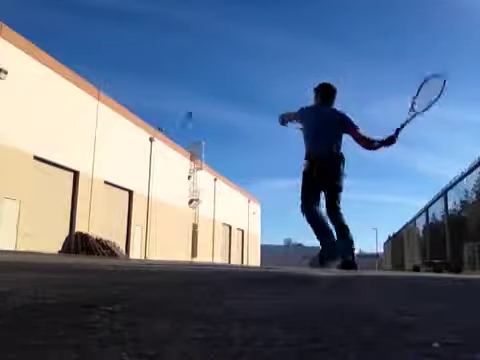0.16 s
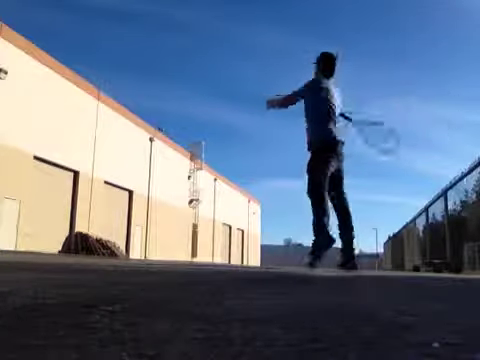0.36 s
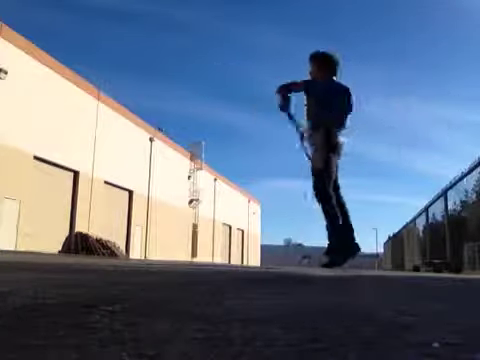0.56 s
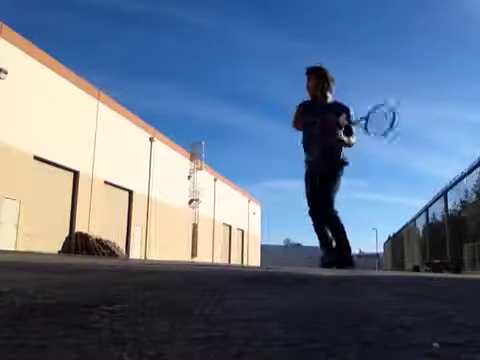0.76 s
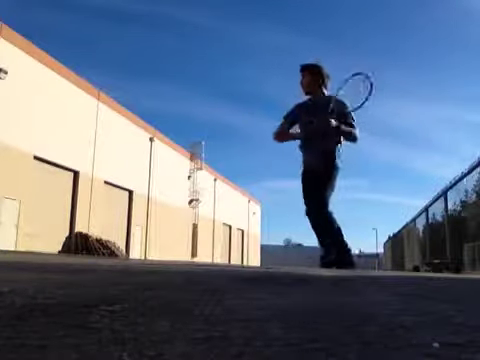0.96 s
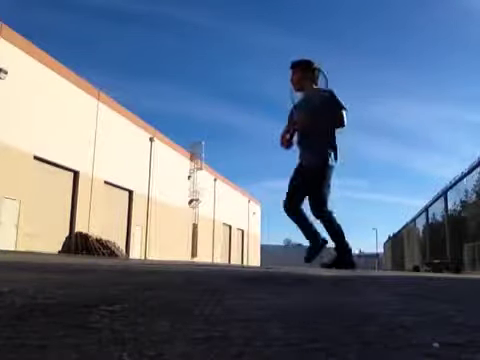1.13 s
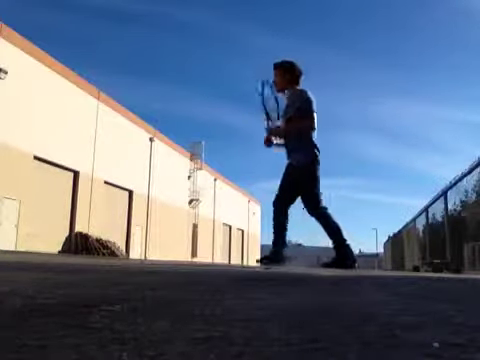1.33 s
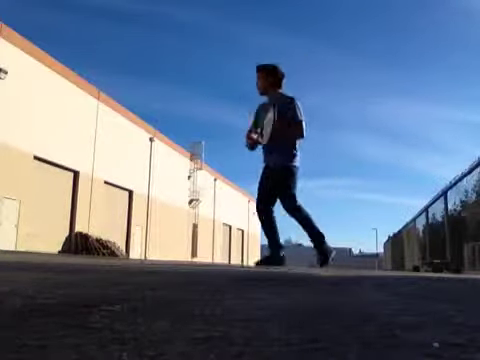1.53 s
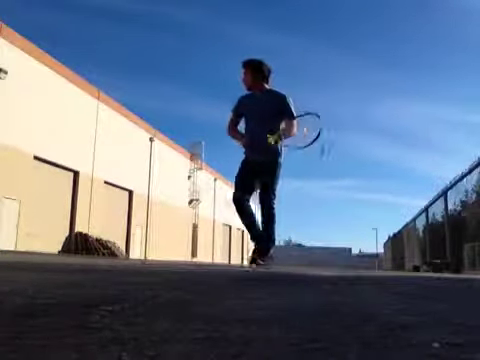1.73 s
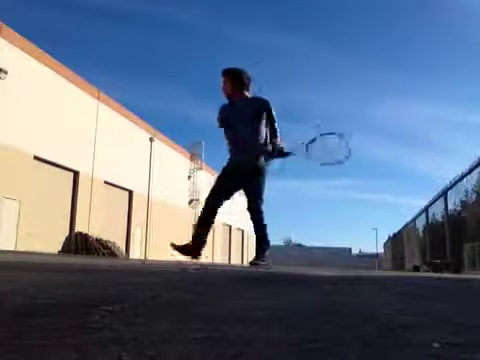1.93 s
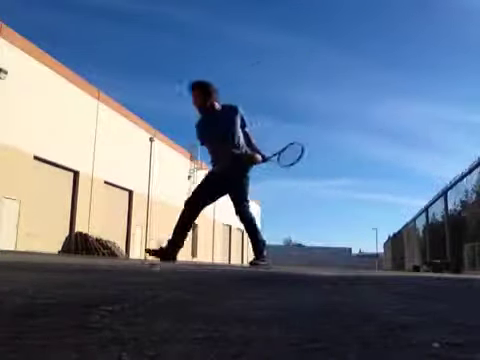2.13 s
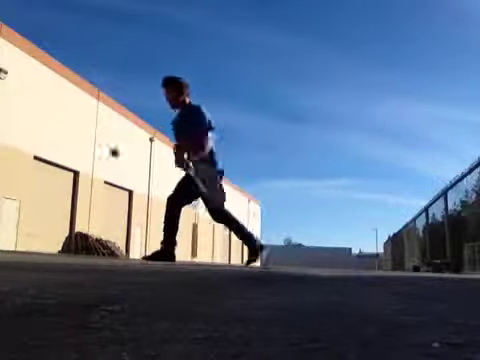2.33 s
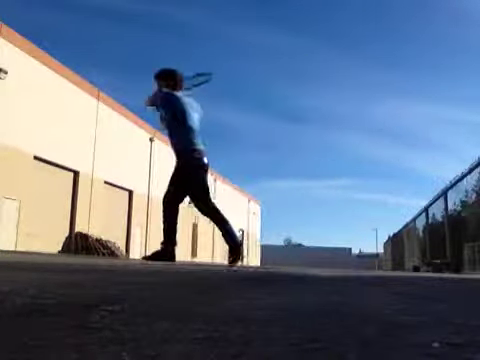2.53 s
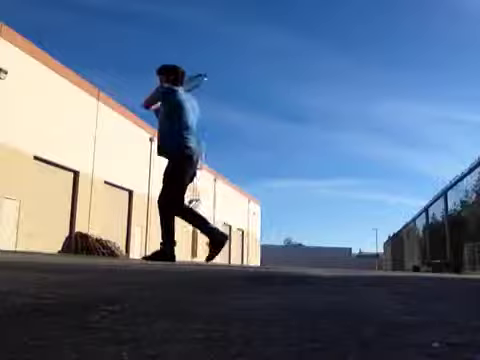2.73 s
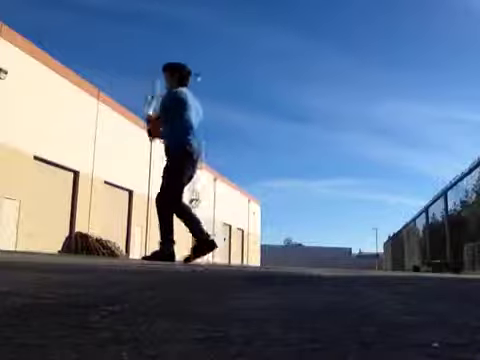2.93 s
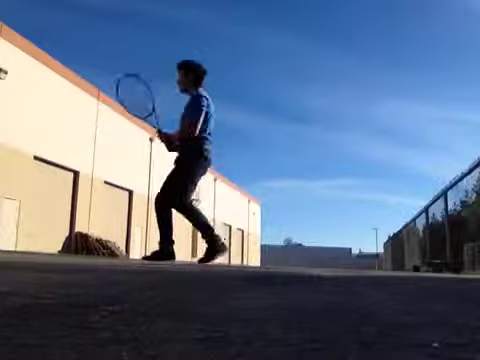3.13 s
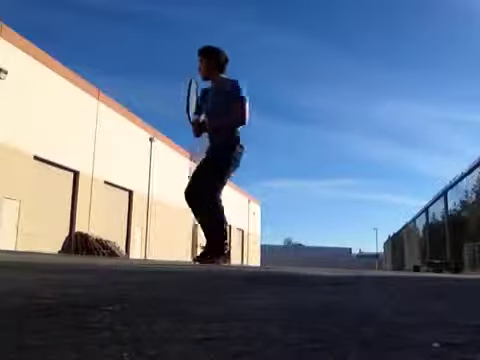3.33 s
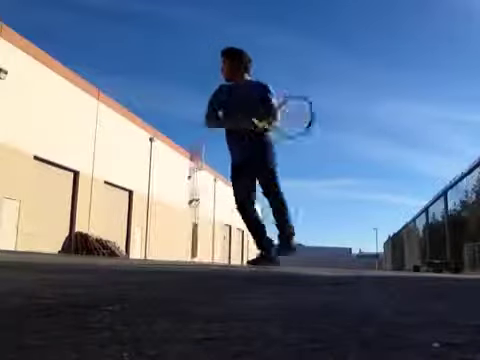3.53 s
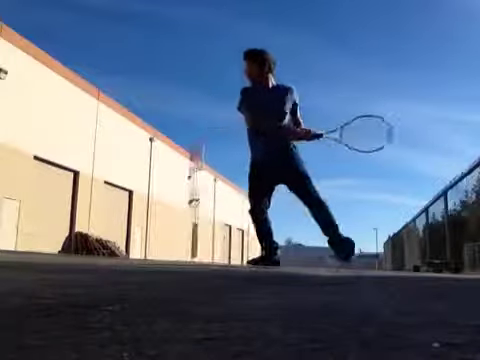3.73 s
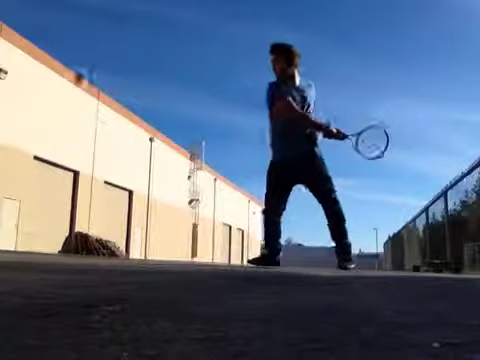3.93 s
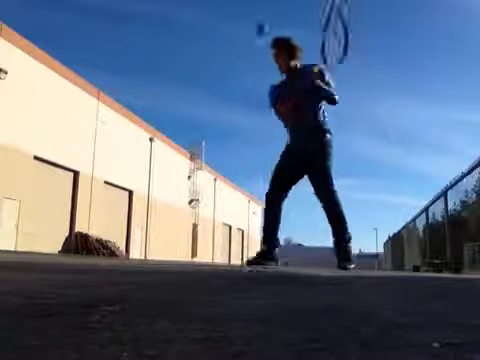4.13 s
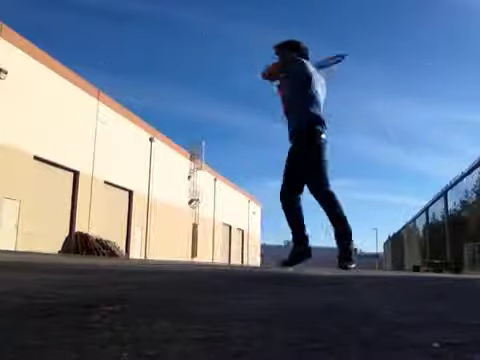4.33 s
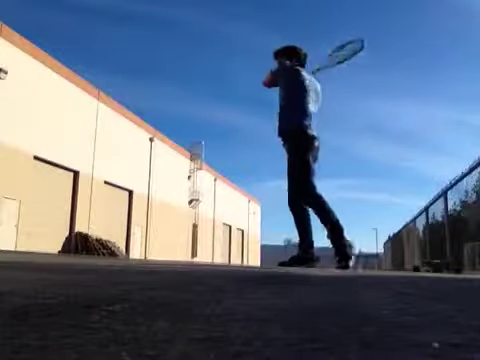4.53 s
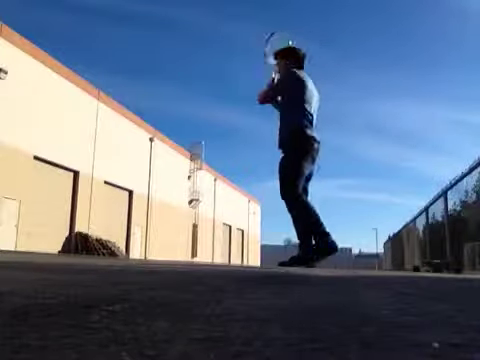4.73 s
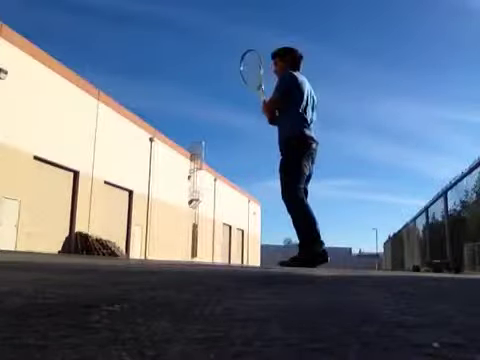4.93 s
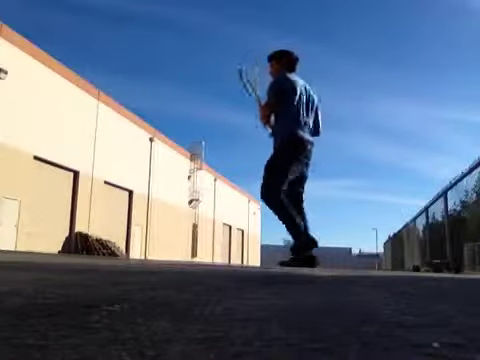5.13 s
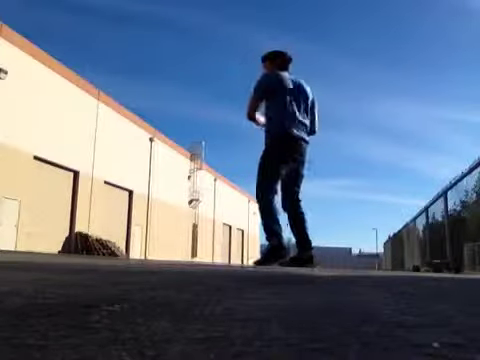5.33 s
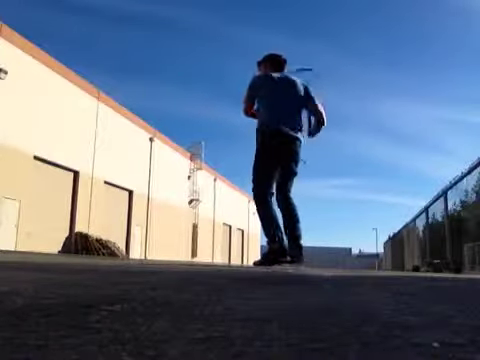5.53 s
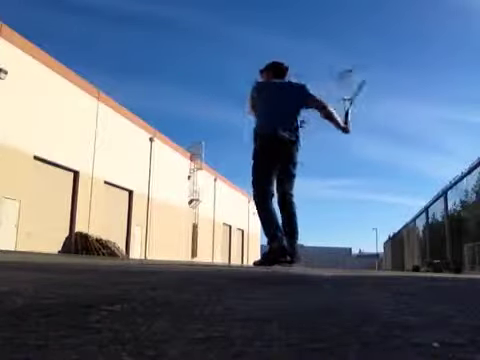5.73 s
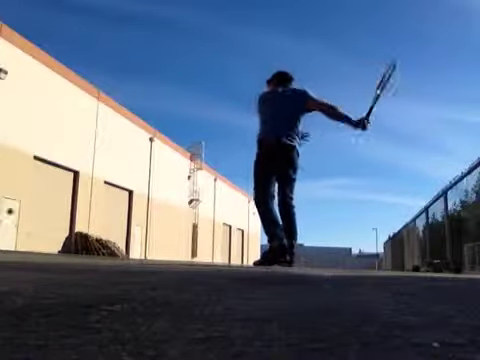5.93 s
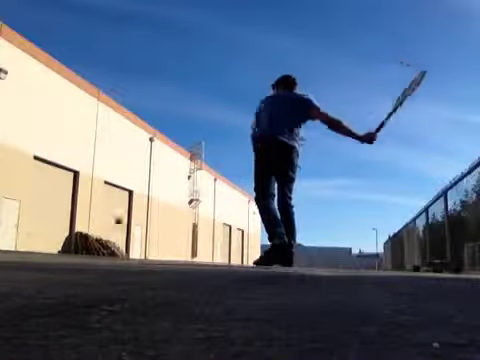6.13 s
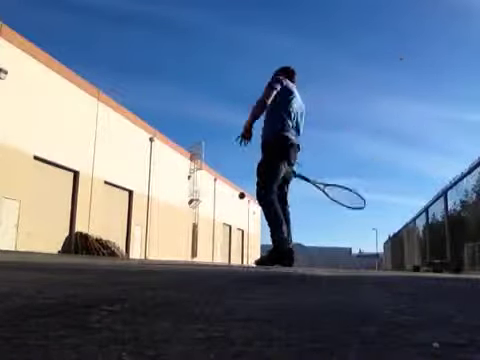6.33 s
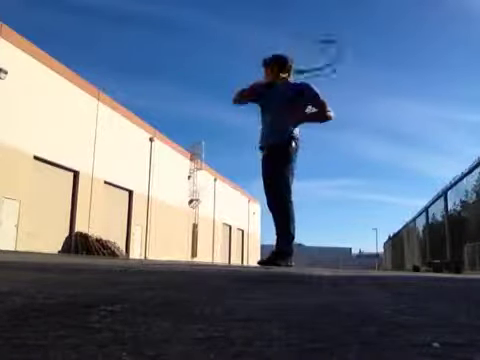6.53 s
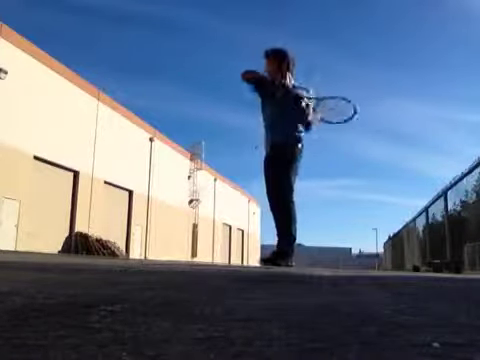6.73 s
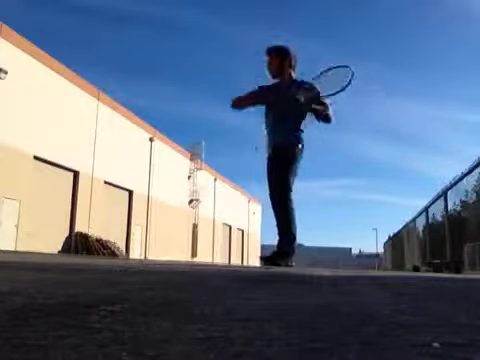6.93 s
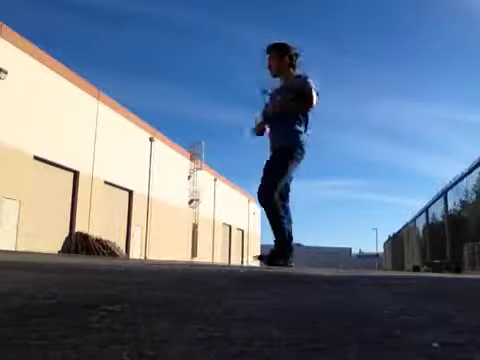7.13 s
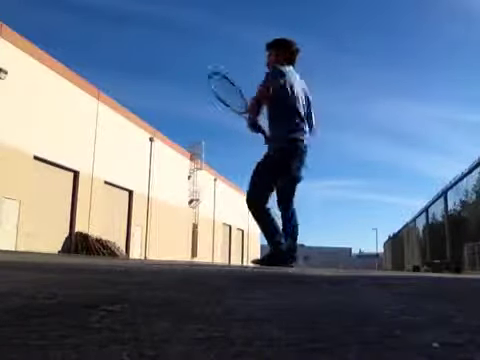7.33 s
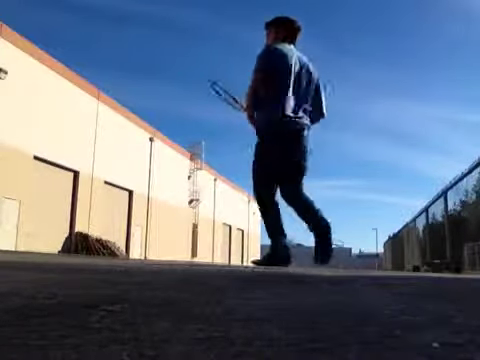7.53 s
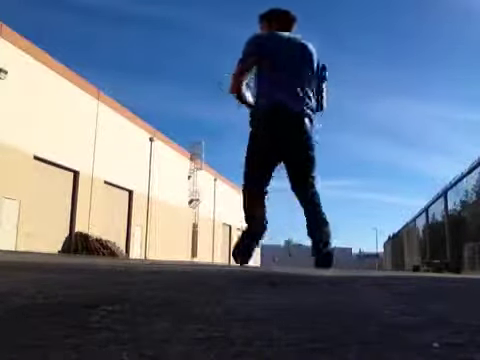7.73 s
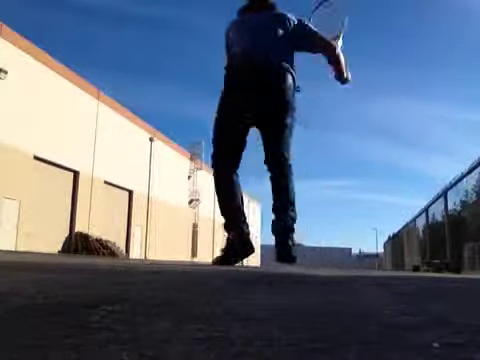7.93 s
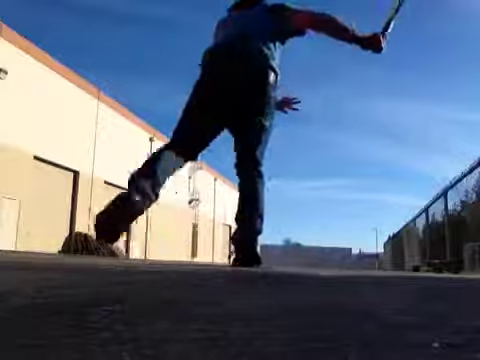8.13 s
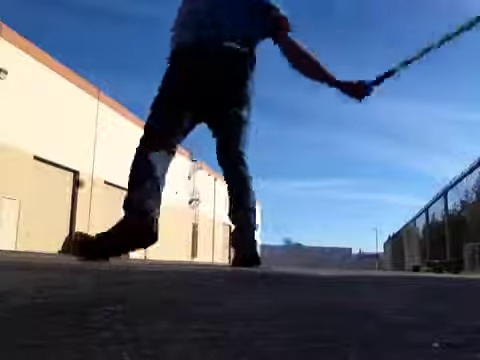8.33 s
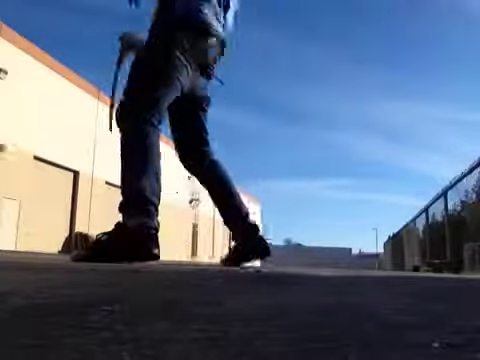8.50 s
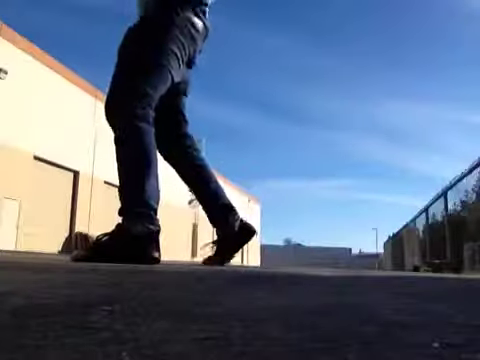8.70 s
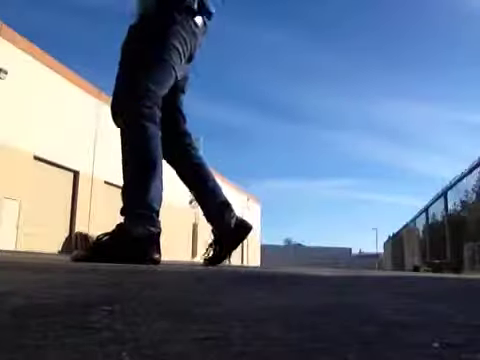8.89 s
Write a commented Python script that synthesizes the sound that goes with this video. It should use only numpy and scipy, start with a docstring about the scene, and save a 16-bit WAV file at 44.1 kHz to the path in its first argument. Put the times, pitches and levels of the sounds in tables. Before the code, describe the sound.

A steady solo rally, one racket stroke roughly every two seconds: a fuzzy rising string whistle cut off by a bright, hollow pop, then a tighter knock from the concrete wall and a faint dull bounce on asphalt. Soles slide and tap on grit, busiest and closest near the end. Short outdoor echoes, low far traffic and thin microphone hiss surround it in mono.

```python
"""A racket pops a hollow felt ball against a concrete wall, outdoors on asphalt.
Each pop is a felt crack, a thump of squeezed air, a ringing cavity and a rattling rubber shell.
The wall echoes each stroke; the swung strings whistle, made of noise whose pitch follows their speed.
Shoes scuff and tap in grainy noise and short knocks, and far traffic hums in coloured noise and low notes.
A small microphone adds hiss and turns its gain down after loud pops."""
import sys
import numpy as np
from scipy import signal
from scipy.fft import rfft, irfft, next_fast_len
from scipy.io import wavfile
from scipy.ndimage import uniform_filter1d, map_coordinates

SR = 44100
rng = np.random.default_rng(int(sys.argv[2]) if len(sys.argv) > 2 else 0)


def elevation(decibels):
    """Turn decibel levels (scalar or array-like) into linear amplitude ratios."""
    levels = np.asarray(decibels, float)
    return 10 ** (levels / 20)


def wav_out(sig):
    """Save sig, one row per channel (or a flat mono array), as 16-bit PCM at SR to the path in sys.argv[1]."""
    wavfile.write(sys.argv[1], SR, np.round(np.clip(np.atleast_2d(sig).T, -1, 1) * 32767).astype(np.int16))


N = 395136  # length in samples

# strings hitting the ball: t/s, felt crack level/dB, thump level/dB, cavity level/dB, shell level/dB, cavity f/Hz
STROKES = [(.4779, -26, -1, -6, -14.5, 933), (2.4136, -19, 0.5, -4, -15, 928),
           (4.2191, -19, -0.5, -3.5, -16.5, 910), (6.4339, -20, -1.5, -4.5, -19, 896),
           (8.5241, -20.5, 2.5, -5, -16, 939)]


def unit(x):
    """Scales a sound to rms 1."""
    return x / np.sqrt(np.mean(x ** 2) + 1e-20)


def along(points, hz):
    """Reads a curve of (f/Hz, value) points on a log frequency axis."""
    f, value = np.transpose(points)
    return np.interp(np.log(hz + 1), np.log(f + 1), value)


def filtered(x, response):
    """Multiplies the spectrum of x by a response of frequency."""
    size = next_fast_len(len(x) + 8192)  # spare room for the filter to ring out
    return irfft(rfft(x, size) * response(np.fft.rfftfreq(size, 1 / SR)), size)[:len(x)]


def small(sound, hz):
    """A small body radiates little bass: a steep cut below hz."""
    return filtered(sound, lambda f: (1j * f / hz / (1 + 1j * f / hz)) ** 3)


def dull(sound, hz):
    """Rolls off the treble above hz, as in a far reflection."""
    return filtered(sound, lambda f: 1 / (1 + 1j * f / hz) ** 2)


def noise(spectrum, size=N):
    """Noise of rms 1, coloured by (f/Hz, level/dB per Hz) points."""
    return unit(filtered(rng.standard_normal(size), lambda hz: elevation(along(spectrum, hz))))


def wobble(rate):
    """A smooth random curve through rate knots a second."""
    knots = rng.standard_normal(int(N * rate / SR) + 4)
    return map_coordinates(knots, [np.arange(N) * rate / SR])


def add(track, s, sound):
    """Mixes a sound into the track at s seconds."""
    part = track[round(s * SR):][:len(sound)]
    part += sound[:len(part)]


def ring(hz, db, t60, delay_ms, attack=0.0001):
    """A damped vibration starts after a delay, builds up over attack seconds and falls 60 dB in t60 seconds."""
    t = np.maximum(np.arange(SR // 10) / SR - delay_ms / 1000, 0)
    return elevation(db - 60 * t / t60) * np.sin(2 * np.pi * hz * t) * (1 - np.exp(-t / attack))


def traffic():
    """Far rumble and tyre roar are coloured noises of changing level; engines are low gliding sine notes."""
    # rumble and roar as heard, with a dip after the loud stroke at 2.41 s: t/s, rumble level/dB, roar level/dB
    levels = [(0, -56.5, -55.5), (.4, -52.5, -55.5), (.62, -53, -52), (1.42, -54, -56.5),
              (1.75, -53.5, -54.5), (2.44, -55, -58.5), (2.62, -60, -58), (3.1, -56, -60),
              (4.16, -55.5, -57), (4.59, -56.5, -57.5), (5.01, -53, -57.5), (5.6, -55, -58),
              (6.44, -53, -56.5), (6.96, -52.5, -55.5), (8.48, -53.5, -55), (8.96, -56.5, -58)]
    # colour of the rumble: f/Hz, level/dB per Hz
    rumble_colour = [(15, -81), (25, -58), (49, -25), (70, -26.5), (125, -2), (161, -4), (237, -5),
                     (325, -12.5), (600, -20.5), (780, -56), (1320, -120)]
    # colour of the tyre roar: f/Hz, level/dB per Hz
    roar_colour = [(210, -20), (350, -10), (550, -8.5), (642, -6.5), (1150, -9.5), (1370, -15), (2030, -22),
                   (6000, -39), (7800, -63), (13200, -120)]
    # engine notes: start t/s, end t/s, first f/Hz, last f/Hz, first level/dB, last level/dB
    engines = [(-.2, 1.6, 81, 80.5, -58.5, -67), (4.7, 5.7, 93.1, 97, -54, -66),
               (5.5, 6.1, 88, 90.4, -61, -54), (6.7, 7.4, 108, 100, -65, -67),
               (7.7, 9.1, 77.6, 78.5, -58, -68)]
    t = np.arange(N) / SR
    s, rumble_db, roar_db = np.transpose(levels)
    rumble = elevation(np.interp(t, s, rumble_db) + 0.76 * wobble(14)) * noise(rumble_colour)
    roar = elevation(np.interp(t, s, roar_db) + 0.9 * wobble(8)) * noise(roar_colour)
    notes = np.zeros(N)
    for s, hz, db in np.reshape(engines, (-1, 3, 2)):
        fade = np.clip(np.minimum(t - s[0], s[-1] - t) / 0.31, 0, 1)
        phase = 2 * np.pi * np.cumsum(np.interp(t, s, hz)) / SR
        notes += np.sqrt(2) * fade * elevation(np.interp(t, s, db)) * np.sin(phase)
    return rumble + roar + notes


def hiss():
    """The microphone's own steady noise."""
    # colour of the hiss: f/Hz, level/dB per Hz
    colour = [(2350, -36), (4000, -3.5), (4800, -3.5), (5280, -2.5), (10100, -11), (14300, -4), (15500, -5)]
    return elevation(-73.5) * noise(colour)


def grit(s, db, hz, rise, fall, octaves):
    """Grit crunches in uneven grains: noise in a band around hz; returns the start and the sound."""
    t = np.arange(SR // 2) / SR
    grain_db = 3.4 * unit(uniform_filter1d(rng.standard_normal(len(t)), size=80))
    grains = rng.standard_normal(len(t)) * elevation(grain_db)

    def band(f):
        return np.exp(-.5 * (np.log2((f + 1) / hz) / octaves) ** 2 - (f / 11000) ** 2)

    colour = unit(filtered(grains, band))
    falling = elevation(-60 * (np.maximum(t - rise, 0) / fall) ** .85)
    return s - rise, elevation(db) * np.minimum(t / rise, 1) ** 2 * falling * colour


def shoes():
    """Stones click, soles slide and drag in bands of grainy noise; heels knock the ground with two damped notes."""
    # single stones under a sole: t/s, level/dB, centre f/Hz
    ticks = [(.054, -63, 9000), (.112, -56, 3000), (.328, -55.5, 9200), (.407, -54, 3500),
             (.495, -48, 10000), (.786, -43, 5170), (1.431, -61, 8150), (1.825, -56, 10000),
             (2.145, -60, 4000), (3.856, -58, 5000), (7.64, -41, 2300), (7.748, -40, 7850),
             (7.76, -46, 6000), (7.892, -55, 5000), (8.1, -61, 10100), (8.149, -57, 7900),
             (8.432, -55, 9000), (8.695, -57, 8050), (8.709, -59, 11000), (8.804, -59, 5960)]
    # soles sliding on grit: t/s, level/dB, fall time/s, centre f/Hz, width/octaves
    slides = [(.66, -50.5, 0.11, 5700, 2.1), (0.791, -43.5, 0.099, 4470, 1.5), (1.53, -59, 0.12, 6000, 2),
              (2.786, -54, 0.079, 3640, 0.65), (2.82, -57, 0.067, 4370, 1.1), (3.5, -62, 0.15, 7050, 3),
              (4.093, -51.5, 0.1, 3500, 3.1), (4.364, -50, 0.18, 3470, 3.3), (4.64, -69, 0.11, 5030, 1.5),
              (5.439, -60, 0.26, 5960, 4.6), (7.591, -48.5, 0.23, 3870, 1.1),
              (7.622, -45.5, .14, 7050, 6.7), (7.77, -50, 0.072, 6000, 0.69),
              (8.037, -48.5, 0.13, 3500, 3.3), (8.059, -45, 0.07, 7000, 5)]
    # slow soft hisses with a faint narrow tone, perhaps a dragged sole: t/s, hiss level/dB, tone level/dB, f/Hz
    drags = [(.87, -60, -59.5, 3820), (1.77, -59.5, -63, 3750), (2.01, -70, -74, 4750),
             (3.33, -90, -81, 4700), (3.41, -80, -74, 3680), (5.72, -94, -76, 2800),
             (6.36, -63.5, -74, 4300), (7.19, -65, -70, 4320)]
    # heels landing: t/s, level/dB, f/Hz, t60/s
    heels = [(.135, -23.5, 266, 0.0047), (0.793, -36, 300, .015), (7.603, -23.5, 575, 0.0084),
             (7.768, -33.5, 950, 0.014), (7.829, -21.5, 300, 0.011), (8.037, -28.5, 446, 0.032),
             (8.065, -23.5, 860, 0.0065), (8.278, -30.5, 300, 0.014)]
    track = np.zeros(N)
    for row in ticks:
        add(track, *grit(*row, rise=0.0011, fall=0.029, octaves=0.89))
    for s, db, fall, hz, octaves in slides:
        add(track, *grit(s, db, hz, rise=.09 * fall, fall=fall, octaves=octaves))
    for s, hiss_db, tone_db, hz in drags:
        add(track, *grit(s, hiss_db, hz, rise=0.053, fall=0.18, octaves=1))
        add(track, *grit(s, tone_db, hz, rise=0.11, fall=0.42, octaves=.08))
    for s, db, hz, t60 in heels:
        low = ring(hz, db, t60, 0, attack=0.00034)
        high = ring(2.13 * hz, db - 11.5, 1.76 * t60, 0)
        add(track, s, small(low + high, hz=90))
    return track


def arc(top_s, top_hz, half_s, whistle_db, rush_db, contact_s=np.inf):
    """One sweep: speed follows a bell curve until the ball is hit; pitch and loudness follow the speed."""
    # parts of the string bed at their own speeds: pitch ratio, relative width, level/dB
    whistles = [(1, .04, 0), (.82, .04, -7), (.69, .05, -3), (.58, .04, -6), (.49, .035, -6),
                (1.3, .06, -16)]
    # colour of the rush at the speed that whistles at 9 kHz: f/Hz, level/dB per Hz
    rush_colour = [(300, 5), (1500, -11.5), (4000, -4), (9000, -9), (15000, -15.5), (22000, -28)]
    t = top_s + np.arange(-2.2 * half_s, 2.5 * half_s, 1 / SR)

    def speed(s):
        return .5 ** (((np.minimum(s, contact_s) - top_s) / half_s) ** 2)

    # two noises, recoloured frame by frame as the speed changes
    raw = rng.standard_normal((2, SR // 2))[:, :len(t)]
    f, frame, z = signal.stft(raw, SR, nperseg=192)
    whistle_hz = top_hz * np.maximum(speed(frame + t[0]), .3)
    ratio = (f[:, None] + 1) / whistle_hz
    bands = sum(elevation(db) * np.exp(-.5 * (np.log(ratio / part) / width) ** 2) for part, width, db in whistles)
    gains = [bands, elevation(along(rush_colour, 9000 * ratio))]
    whistle, rush = signal.istft(z * gains, nperseg=192)[1][:, :len(t)]
    # the ball brakes the strings, so both sounds die away; loudness grows with a power of speed
    braked = np.maximum(t - contact_s, 0)
    whistle = elevation(whistle_db - 60 * braked / 0.023) * speed(t) ** 5.3 * unit(whistle)
    rush = elevation(rush_db - 60 * braked / 0.2) * speed(t) ** 2.4 * unit(rush)
    return t[0], whistle + rush


def racket():
    """Strings shed vortices: fuzzy whistles over a rush of air, into the ball and again in the follow-through."""
    # swings, one a stroke: bell top t/s, whistle f/Hz there, time from half to top speed/s,
    # whistle level/dB, rush level/dB
    swings = [(.478, 9100, 0.09, -57, -53.5), (2.411, 10050, 0.079, -32.5, -46.5),
              (4.203, 8660, 0.071, -42.5, -51), (6.445, 10500, .065, -48, -45.5),
              (8.535, 10770, 0.066, -34, -39.5)]
    # follow-throughs, one a stroke, same columns: t/s, f/Hz, time/s, whistle level/dB, rush level/dB
    follows = [(0.541, 7200, 0.1, -71, -52), (2.464, 8300, 0.08, -56, -79), (4.27, 7200, 0.098, -59.5, -63),
               (6.5, 8450, 0.094, -67, -54.5), (8.589, 8200, 0.076, -71, -53)]
    track = np.zeros(N)
    for swing, follow, stroke in zip(swings, follows, STROKES):
        add(track, *arc(*swing, contact_s=stroke[0]))
        add(track, *arc(*follow))
    return track


def blow(row, thump_hz, quick_db, thump_ms, ring_ms, damping, crack_t60, snap_db, recrack_db, rattle_t60,
         way=1, widen=1):
    """The felt cracks, the squashed ball pumps one thump of air, its cavity rings and its shell rattles."""
    # colour of the felt crack: f/Hz, level/dB per Hz
    felt = [(1500, -18), (4000, 0), (9000, -14.5), (15000, -44)]
    # the ball's air cavity: pitch ratio, level/dB against the ring, t60/s before the surface damps it
    air_modes = [(0.992, 0.5, 0.024), (1.21, -9, 0.032), (0.943, -6.5, .018), (1.02, -19, .08)]
    # rubber shell: f/Hz, width/Hz before the surface widens it, level/dB against the other modes
    shell_modes = [(1500, 250, -9), (1800, 110, 0), (2080, 220, -6), (2445, 100, 0), (3340, 500, -13),
                   (4230, 600, -14), (5000, 700, -14)]
    crack_db, thump_db, cavity_db, shell_db, cavity_hz = row
    t = np.arange(SR // 10) / SR

    # the felt cracks again as the ball leaves the surface
    leave_s = 0.0041
    again = (t > leave_s) * elevation(recrack_db - 60 * np.maximum(t - leave_s, 0) / crack_t60)
    crack = elevation(crack_db) * (elevation(-60 * t / crack_t60) + again) * noise(felt, size=len(t))
    snap = -ring(1250, thump_db + snap_db, .004, 0, attack=.00005)

    # squashing and springing back: a slow and a quick swing of the same push
    slow = ring(thump_hz, thump_db, .012, thump_ms, attack=.0005)
    quick = ring(1.55 * thump_hz, thump_db + quick_db, .012, thump_ms, attack=.0005)
    thump = way * (slow + quick)

    cavity = sum(ring(ratio * cavity_hz, cavity_db + db, t60 / damping, ring_ms, attack=.0011 / damping)
                 for ratio, db, t60 in air_modes)

    # a short scrub of noise shakes the shell's modes, a little differently at each blow
    scrub = rng.standard_normal(len(t)) * elevation(-60 * t / rattle_t60) * np.minimum(t / .002, 1)
    struck_db = rng.normal(0, 3, len(shell_modes))

    def resonances(f):
        total = 0
        for k, (centre, width, db) in enumerate(shell_modes):
            loss = 1j * f * width * widen
            total = total + (-1) ** k * elevation(db + struck_db[k]) * loss / (centre * centre - f * f + loss)
        return total

    shell = filtered(dull(scrub, hz=4000), resonances)
    return small(crack + snap + thump + cavity + elevation(shell_db) * shell / np.abs(shell).max(), hz=108)


def yard(sound, db):
    """Scattered returns from ground, fence and buildings; each frequency dies at its own speed."""
    # how long the scattered tail lasts: f/Hz, t60/s
    decay = [(150, 0.46), (1000, 0.29), (2500, 0.42), (5000, 0.36), (12000, 0.31)]
    hz, t, z = signal.stft(rng.standard_normal(SR // 2), SR, nperseg=256)
    tail = signal.istft(z * elevation(-60 * t / along(decay, hz)[:, None]), SR, nperseg=256)[1]
    return elevation(db) * signal.fftconvolve(sound, tail / np.linalg.norm(tail))


def wall_echo(pop, db):
    """The ringing ball flies towards the wall, so its echo comes back higher, duller and shorter."""
    sample = np.arange(len(pop))
    higher = np.interp(1.2 * sample, sample, pop, right=0)
    age = sample / SR
    fading = elevation(db + 8.5 - 60 * age / 0.062) * np.minimum(age / 0.0037, 1)
    return small(dull(fading * higher, hz=1540), hz=202)


def strokes():
    """Strings strike the ball; the wall returns an echo and the yard scatters both."""
    # each stroke's wall echo: delay/s, level/dB before a common lift of 8.5 dB
    echoes = [(.066, -13), (.0675, -19), (.072, -17), (.067, -14), (.0718, -18)]
    track = np.zeros(N)
    for (s, *row), (delay, db) in zip(STROKES, echoes):
        pop = blow(row, thump_hz=315, quick_db=-3, thump_ms=1.3, ring_ms=3.45, damping=1, crack_t60=.009,
                   snap_db=-12, recrack_db=-9, rattle_t60=.045)
        echo = wall_echo(pop, db)
        add(track, s, pop)
        add(track, s + delay, echo)
        add(track, s + delay + .008, yard(echo, db=-8.5))
        add(track, s + .006, yard(pop, db=-24.5))
    return track


def mesh(sound, t60):
    """Wire mesh and posts return a smeared, bright copy."""
    smear = rng.standard_normal(SR // 10) * elevation(-60 * np.arange(SR // 10) / SR / t60)
    return small(signal.fftconvolve(sound, smear / np.linalg.norm(smear)), hz=1000)


def wall_hits():
    """Hard concrete damps the ball's ring and widens its shell modes; a fence and a dull far return answer."""
    # ball on the wall: t/s, felt crack level/dB, thump level/dB, cavity level/dB, shell level/dB, cavity f/Hz
    hits = [(1.0171, -23, -3.5, -10.5, -20, 927), (2.877, -27.5, -5.5, -16, -24.5, 856),
            (4.7876, -19.5, -7, -10.5, -22.5, 923), (6.9417, -23.5, -3.5, -7.5, -19, 908)]
    # fence echoes: delay/s, level/dB before the mesh cuts the bass, smear t60/s
    fence = [(.023, -13, 0.026), (.068, -19, 0.13)]
    track = np.zeros(N)
    for s, *row in hits:
        pop = blow(row, thump_hz=300, quick_db=-3, thump_ms=.5, ring_ms=2.85, damping=1.1, crack_t60=.003,
                   snap_db=1, recrack_db=-20, rattle_t60=.004, widen=7)
        add(track, s, pop)
        for delay, db, t60 in fence:
            add(track, s + delay, elevation(db) * mesh(pop, t60))
        add(track, s + .078, elevation(-24) * dull(pop, hz=500))  # far wall
        add(track, s + .006, yard(pop, db=-19))
    return track


def door():
    """Sheet metal near the wall pings along, each time as one damped high note."""
    # pings: t/s, f/Hz, level/dB, t60/s
    pings = [(1.021, 4600, -47, .13), (4.795, 4610, -52, .15)]
    track = np.zeros(N)
    for s, hz, db, t60 in pings:
        add(track, s, ring(hz, db, t60, 0, attack=0.0036))
    return track


def bounces():
    """Asphalt damps the ball's ring strongly and pushes the air the other way."""
    # ball on the ground: t/s, felt crack level/dB, thump level/dB, cavity level/dB, shell level/dB, cavity f/Hz
    landings = [(1.6297, -44, -23.5, -33, -59, 1080), (3.7066, -39, -17.5, -27, -38, 1040),
                (5.2578, -45.5, -27.5, -38.5, -48, 1100), (6.0911, -51, -32, -33, -39, 1070),
                (7.4326, -41.5, -33, -30.5, -65, 1120), (8.1431, -51, -41, -30.5, -50, 1060)]
    track = np.zeros(N)
    for s, *row in landings:
        pop = blow(row, thump_hz=230, quick_db=-18, thump_ms=2.5, ring_ms=.35, damping=2.4, crack_t60=.003,
                   snap_db=-1, recrack_db=-16, rattle_t60=.006, widen=3, way=-1)
        add(track, s, pop)
        add(track, s + .005, yard(pop, db=-19.5))
    return track


def scene():
    """All sources at the microphone, as one channel."""
    ball = strokes() + wall_hits() + bounces()
    return (ball + door() + racket() + shoes() + traffic())[None]


def gain_control(x, over_db, share, sink_s, release_s):
    """Peaks over a threshold pull the gain down; it sinks in, then creeps back."""
    excess_db = np.maximum(20 * np.log10(np.abs(x) + 1e-9) - over_db, 0)
    t = np.arange(2 * SR) / SR
    memory = (1 - np.exp(-t / sink_s)) * np.exp(-t / release_s)
    # the excess is summed up in dB times milliseconds
    pull = signal.fftconvolve(excess_db, memory)[:len(x)] / (SR / 1000)
    return x * elevation(-share * pull)


def band_limit(x):
    """A steep low-pass at the top of the band."""
    return signal.sosfilt(signal.butter(12, 16430, fs=SR, output="sos"), x)


def record(dry):
    """The microphone adds hiss, loses the lowest bass and the top treble, and rides its gain."""
    x = dry[0] + hiss()
    x = filtered(x, lambda f: 1j * f / 70 / (1 + 1j * f / 70) * (f < 15600))
    x = gain_control(x, over_db=-6, share=0.51, sink_s=0.13, release_s=.35)
    return band_limit(x[None])


dry = scene()
out = record(dry)
wav_out(out)
```